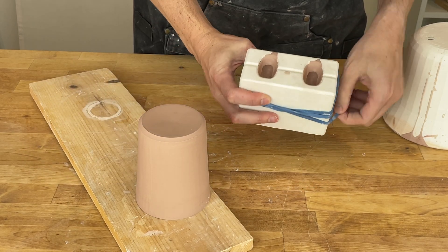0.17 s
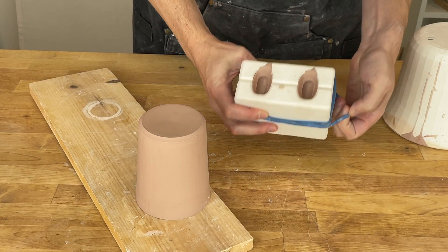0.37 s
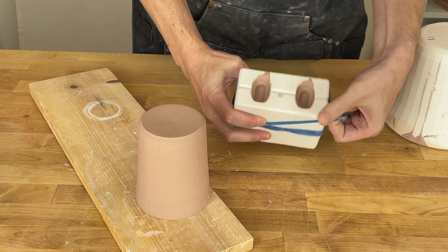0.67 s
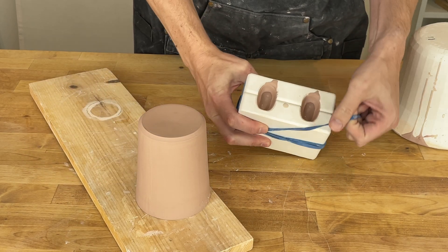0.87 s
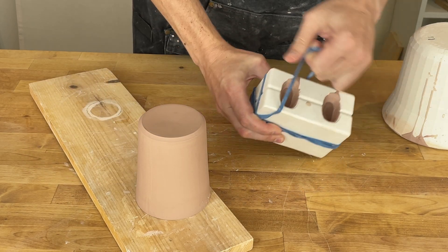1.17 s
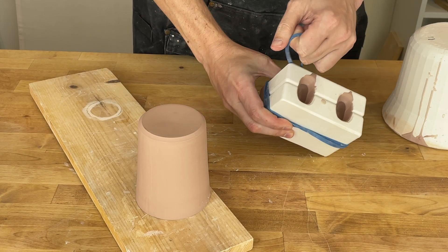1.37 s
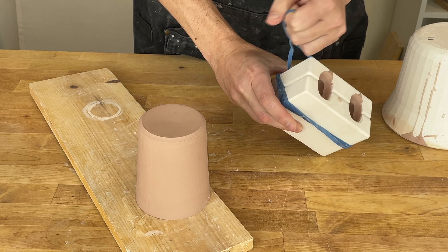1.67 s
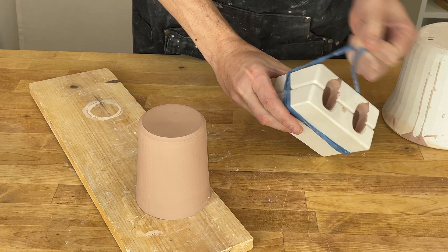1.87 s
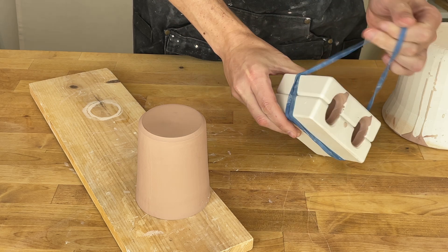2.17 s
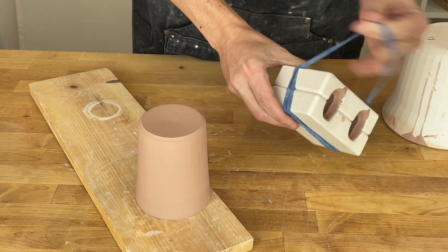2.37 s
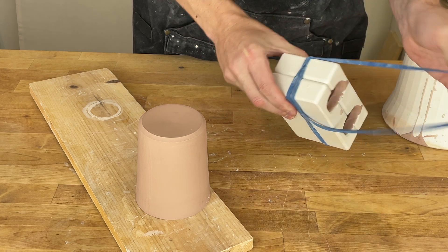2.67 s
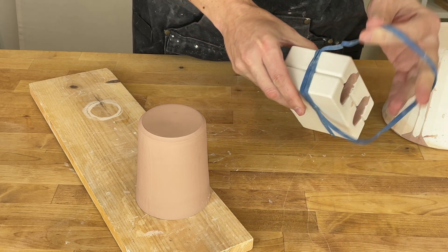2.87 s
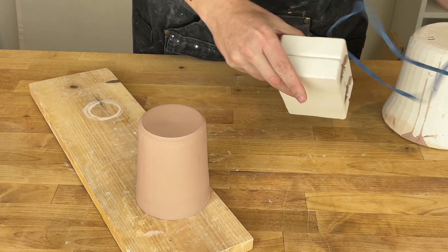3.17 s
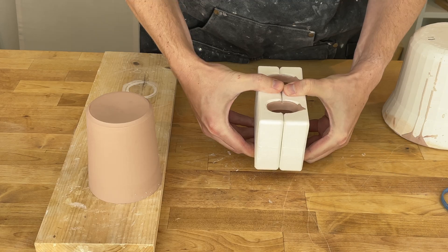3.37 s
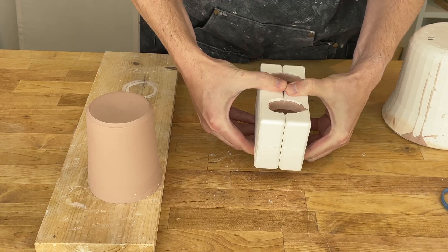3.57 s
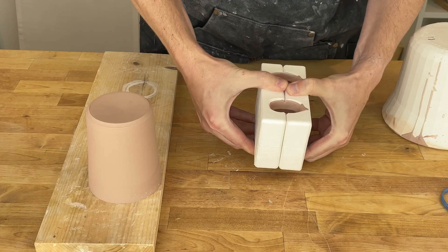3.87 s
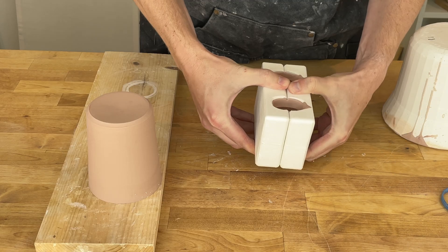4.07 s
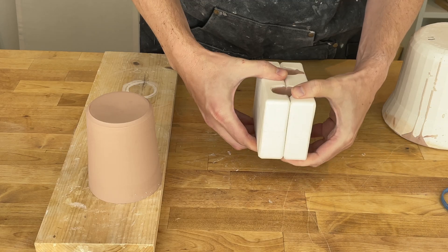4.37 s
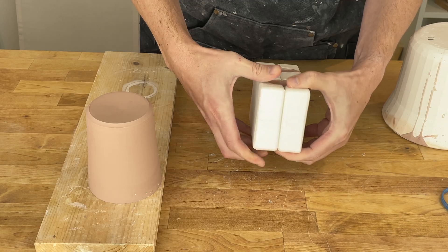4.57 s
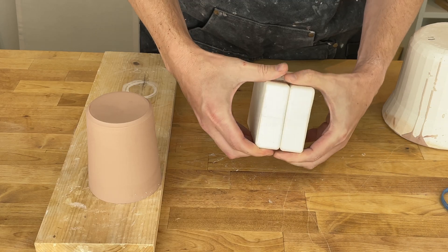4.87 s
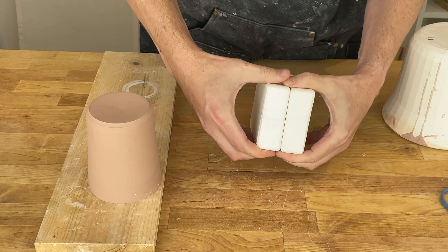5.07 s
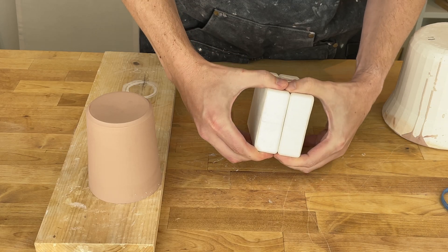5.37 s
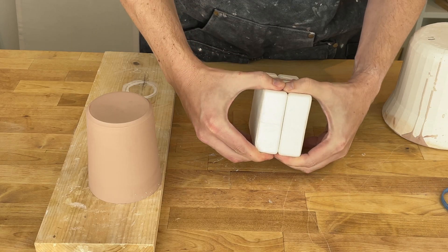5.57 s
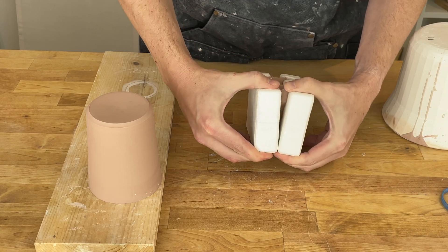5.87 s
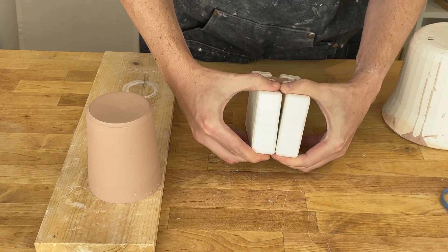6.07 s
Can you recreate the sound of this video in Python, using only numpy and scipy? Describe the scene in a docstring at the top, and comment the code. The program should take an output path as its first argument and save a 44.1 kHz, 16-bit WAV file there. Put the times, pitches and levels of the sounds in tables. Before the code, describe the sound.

Wide rubber bands are worked off a plaster mould, heard close in a small workshop. Soft rubbing and a low flap at 0.3 seconds lead to crackling clicks around 0.7. A band slaps the block with a dull thud at 0.9 seconds. A sharp snap comes just before the loudest thud at 1.2, and a third thud lands at 1.4. Each blow leaves a short, low ring in the room. From 1.5 to 3.2 seconds there are only faint ticks, brief rubs and soft flaps of slack rubber. A quiet stretch follows, with fingers sliding faintly on plaster around 4.3 and 5 seconds. The mould halves bump softly at 5.6, scrape and tick at 5.9, then knock firmly together just before 6 seconds. Underneath run a low rustle of arms and apron, steady ventilation rumble, faint hiss and a thin electrical whine.

```python
"""In a small workshop, wide rubber bands are worked off a two-part plaster mould held over a bench.
The rubber rubs, crackles as it slips, and slaps back on the block; then the halves are eased apart
and knock together. Each blow is a short pulse that sets the room's low notes ringing.
Behind it all are rustling arms, ventilation rumble, faint hiss and an electrical whine."""
import sys
import numpy as np
from scipy import signal
from scipy.fft import rfft, irfft
from scipy.io import wavfile

SR = 44100
rng = np.random.default_rng(int(sys.argv[2]) if len(sys.argv) > 2 else 0)


def to_wav(s):
    """Save 16-bit WAV."""
    ch = np.atleast_2d(s).T  # columns
    pcm = np.round(np.clip(ch, -1, 1) * 32767)  # PCM
    wavfile.write(sys.argv[1], SR, pcm.astype(np.int16))


N = 273728
TIME = np.arange(N) / SR

# blows from the bands, then from the other half of the mould:
# t/s, peak level/dB, low edge/Hz, high edge/Hz, crack level relative to the peak/dB
BLOWS = [(0.8786, -5.5, 191, 568, -19), (1.2262, -3.0, 224, 440, -16), (1.4439, -9.5, 157, 450, -19),
         (5.6088, -23, 93, 440, -20.5), (5.8880, -28.5, 177, 566, -19), (5.9604, -12, 168, 546, -19.5)]


def knocks(soft_hz=790, crack_hz=1500, crack_decay_s=.002, grit=0.1):
    """A soft blow on the block gives one dull pulse, with a little crack where the surfaces meet."""
    out, click = np.zeros(N), signal.unit_impulse(SR // 20)
    contact = cut(click, soft_hz, "low", order=6)  # a soft contact is too slow to make high notes
    crack_fade = np.exp(-TIME[:len(click)] / crack_decay_s)
    for s, db, low_hz, high_hz, crack_db in BLOWS:
        thud = cut(cut(contact, high_hz, "low", order=4), low_hz, "high")
        touches = click + grit * rng.standard_normal(len(click)) * crack_fade
        crack = cut(cut(touches, crack_hz, "low", order=3), soft_hz, "high", order=3)
        add(out, s, from_db(db) * peak_one(thud))
        add(out, s + 0.00065, from_db(db + crack_db) * peak_one(crack))
    return out


def tick(hz, decay_s, grit=0.28, ring_gain=1.2):
    """A slip lets go with one click and a fast-dying spray of smaller ones, ringing briefly."""
    # tone colour that every slip starts from: f/Hz, level/dB
    slip_colour = [(60, -44), (300, -3.5), (700, -2.5), (1700, 3.5), (2700, -1.5), (3500, 3), (5400, 0),
                   (6400, -5.5), (10000, -7), (16000, -9)]
    t = TIME[:SR // 30]
    spray = grit * rng.standard_normal(len(t)) * np.exp(-t / decay_s)
    spray[0] = 1  # the first click
    spray = coloured(spray, slip_colour)
    ring = band_around(spray, hz, octaves=.3, order=1)
    sound = cut(spray, 1.5 * hz, "low", order=1) + ring_gain * ring
    strength = np.sqrt(np.sum(sound ** 2) / (decay_s * SR))
    return sound / (3.04 * strength)  # brings the peak to roughly 1


def ticks():
    """Rubber lets go of an edge or plaster touches plaster; every blow also brings a tick."""
    # lone ticks: t/s, rough peak level/dB, f/Hz
    lone_ticks = [(0.6860, -23, 3800), (0.6940, -28, 4400), (0.7077, -27.5, 6050), (0.7451, -16, 13700),
                  (0.9890, -30, 4860), (1.1683, -9, 4900), (1.173, -20.5, 5990), (1.3782, -32, 3800),
                  (1.3881, -32, 5100), (1.3951, -35, 5540), (1.411, -22, 5900), (1.5793, -33, 6350),
                  (1.6036, -38, 5000), (1.6405, -36, 7500), (1.676, -36.5, 6200), (1.9864, -30.5, 7240),
                  (2.1025, -42.5, 2000), (2.151, -40.5, 3400), (2.558, -28, 7900), (2.6018, -35, 5500),
                  (3.123, -44, 3200), (3.1462, -40.5, 3300), (5.3508, -44.5, 1750), (5.8941, -33.5, 4660),
                  (5.9428, -40.5, 2980)]
    out = np.zeros(N)
    for s, db, hz in lone_ticks:
        add(out, s, from_db(db) * tick(hz, decay_s=0.0014 * (5000 / hz)))  # higher ticks die sooner
    for s, db, *_ in BLOWS:
        add(out, s + 0.0011, from_db(db - 28.5) * tick(hz=5350, decay_s=0.0035))
    return out


def flaps(rebound_db=-8.5, rebound_pitch_ratio=0.63):
    """Slack rubber pushes the air to and fro once, then swings back, weaker and lower."""
    # dull flaps of rubber and shifts of the grip: t/s, peak level/dB, f/Hz
    slack_flaps = [(0.1807, -43.5, 124), (0.3273, -27.5, 111.4), (0.441, -43, 176), (0.5803, -44, 154),
                   (1.9982, -41, 135), (2.18, -45, 115), (2.5416, -36, 197), (2.712, -50, 155),
                   (2.873, -44, 237), (3.1435, -40, 212), (3.209, -36, 156)]
    out, t = np.zeros(N), TIME[:SR // 20] - TIME[SR // 40]
    for s, db, hz in slack_flaps:
        wait_s = .0155 * (155 / hz) ** 2  # slacker, deeper flaps swing back later
        rebound = (s + wait_s, db + rebound_db, hz * rebound_pitch_ratio)
        for swing_s, swing_db, swing_hz in [(s, db, hz), rebound]:
            spread = (np.pi * swing_hz * t) ** 2
            pulse = (1 - 2 * spread) * np.exp(-spread)  # one bump with a dip on each side
            add(out, swing_s + t[0], from_db(swing_db) * pulse)
    return out


def scuffs(rasp_hz=3120, hiss_hz=5800):
    """A hard drag bites and dies away: tiny slips make a hollow body, a rasp and taut rubber's hiss."""
    # drags over an edge of the mould:
    # t/s, rise/s, body level at its loudest/dB, body f/Hz, rasp and hiss relative to the body/dB
    drags = [(0.6810, .007, -43, 750, -6, -17), (1.1652, 0.0028, -27.5, 420, -6, -13),
             (2.102, 0.005, -56.5, 890, -13, -2), (2.151, 0.011, -57, 635, -10, -7),
             (2.551, .012, -56, 910, -0.5, 6), (3.119, .021, -53, 440, -4, -14),
             (5.8841, 0.0048, -41.5, 1210, -3, -38)]
    out, t = np.zeros(N), TIME[:SR // 5]
    for s, rise_s, db, hz, rasp_db, hiss_db in drags:
        slips = tiny_slips(len(t), unevenness_db=5.5)
        body = rms_one(band_around(slips, hz, octaves=1.39))
        rasp = from_db(rasp_db) * rms_one(band_around(slips, rasp_hz, octaves=0.2966, order=1))
        hiss = from_db(hiss_db) * rms_one(band_around(slips, hiss_hz, octaves=2.6, order=1))
        bite = t / rise_s * np.exp(1 - t / rise_s)
        add(out, s, from_db(db) * (body + rasp + hiss) * bite)
    return out


def rubs():
    """Rubber and fingers slide on plaster; tiny slips swell and fade under each stroke."""
    # strokes (narrow ones nearly squeak): t/s, length/s, level at its loudest/dB, f/Hz, width/octaves
    strokes = [(-0.08, 0.36, -67.5, 3930, 0.69), (0.386, 0.091, -61, 794, 3.9),
               (0.513, 0.32, -65, 4000, 1.5), (1.002, 0.14, -66, 5740, 0.67),
               (1.355, 0.098, -52.5, 3840, 1.04), (1.605, 0.12, -60.5, 6240, 0.78),
               (1.96, 0.051, -60.5, 7250, 0.18), (2.098, 0.14, -64, 1720, 1.1),
               (2.442, 0.052, -66, 10000, 0.99), (2.94, 0.037, -64, 6000, 2.2),
               (3.132, 0.09, -58, 1780, 1.7), (4.249, 0.16, -68.5, 5000, 1.3),
               (4.936, .11, -63.5, 3730, 1.8), (5.224, 0.032, -61, 1790, 4)]
    out = np.zeros(N)
    for s, length_s, db, hz, octaves in strokes:
        slips = tiny_slips(int(length_s * SR), unevenness_db=6.0)
        band = rms_one(band_around(slips, hz, octaves))
        swell = np.sin(np.linspace(0, np.pi, len(band)))
        add(out, s, from_db(db) * band * swell)
    return out


def tiny_slips(size, unevenness_db):
    """Friction is a dense stream of little pulses of uneven size."""
    noise, sizes = rng.standard_normal((2, SR // 2))[:, :size]
    return noise * from_db(unevenness_db * sizes)


def room_echoes():
    """The bench top and nearest walls are cluttered, so only the lows bounce back in one piece."""
    # first echoes: delay/s, gain
    echoes = [(.0029, .47), (.0134, .41), (.0244, .51), (.0322, .24)]
    out = np.zeros(N)
    for delay_s, gain in echoes:
        add(out, delay_s, np.array([gain]))
    return cut(out[:SR], 1800, "low")


def room_ring(boost_db=0.32, fade_speedup=1.11):
    """The bench and the air in the room ring at their own notes after a push."""
    # ringing notes of the bench and room, from low to high:
    # f/Hz, gain before boost/dB, time to fade 60 dB before speedup/s
    low_notes = [(45, 17, .36), (59, 14.6, .32), (85, 8, .36), (109, 13.5, .22), (130, 5, .4),
                 (148, 11.5, .52), (163, 1, .5), (192, 11, .21), (239, 11.2, .42), (264, 9.7, .6),
                 (276, 8, .62), (297, 6, .34), (326, -2, .5), (363, 9.5, .28), (377, 6.3, .36),
                 (410, 8, .45), (438, 9, .4), (452, 5.5, .66), (511, 7.2, .38), (527, 11, .4),
                 (565, 4, .55), (594, 3.5, .45), (615, 5.5, .5), (632, 10.5, .29), (656, 4.6, .55),
                 (676, 1.5, .45), (727, 8, .36), (784, -1, .36)]
    high_notes = [(926, 5, .33), (971, 10, .4), (1087, 8, .45), (1193, 10, .5), (1267, 8, .5),
                  (1477, 9, .4), (1811, 8, .42)]
    out, t = np.zeros(SR), np.maximum(TIME[:SR] - .0019, 0)
    for k, (hz, db, fade_s) in enumerate(low_notes + high_notes):
        damping = fade_speedup * np.log(1000) / fade_s
        gain = from_db(db + boost_db) * 2 * damping / SR
        direction = (-1) ** k  # neighbours cancel at first, so the boom builds up after the blow
        out += direction * gain * np.exp(-damping * t) * np.sin(2 * np.pi * hz * t)
    return out


def room_tail(build_up_s=.004):
    """Scattered echoes blur into noise, each band of pitch dying at its own pace."""
    # tone colour of the blurred echoes: f/Hz, level/dB
    tail_colour = [(60, -5), (200, -9), (500, -4), (800, 3), (1300, 3), (2500, 2), (4000, -1), (5400, -4),
                   (9000, -3.5), (16000, 5)]
    # how long they last: f/Hz, time to fade 60 dB/s
    fade_times = [(60, 0.67), (300, 0.6), (1100, 0.51), (3000, 0.38), (7000, 0.43), (16000, .24)]
    out, t = np.zeros(SR), TIME[:SR]
    edges = np.geomspace(40, 17000, 19)
    build_up = 1 - np.exp(-t / build_up_s)
    for low, high in zip(edges, edges[1:]):
        hz = np.sqrt(low * high)
        band = cut(rng.standard_normal(SR), [low, high], "band")
        fade = np.exp(-np.log(1000) * t / at_hz(fade_times, hz))
        gain = from_db(at_hz(tail_colour, hz)) * np.sqrt(2 * (high - low)) / SR
        out += gain * rms_one(band * fade * build_up)
    return out


def background(hiss_db=-63, lump_db=5.5, lump_hz=14):
    """Steady rumble, hiss and whine, with the low, uneven rustle of arms and apron."""
    # ventilation rumble and faint hiss: f/Hz, relative level/dB
    hiss_colour = [(20, -13), (40, -1), (57, 1.5), (85, -1.5), (135, -1), (200, -7.5), (320, -10),
                   (500, -12), (1000, -13.5), (2000, -17), (4000, -18), (8000, -21), (16000, -23.5)]
    # mains hum and electrical whine: f/Hz, level/dB
    tones = [(241, -79), (360.7, -73), (500.3, -79), (1000.5, -74), (2001, -82.5), (2499, -82),
             (3499, -81.5), (4000, -86.5), (4500, -86), (5001, -84), (5501, -90), (6001, -87), (6499, -88),
             (7499, -90)]
    # rustle of moving arms: t/s, level/dB
    arm_motion = [(0, -69), (0.3, -61), (0.42, -56.5), (0.8, -69), (1.7, -60), (2.3, -58.5), (2.8, -66.5),
                  (3.3, -62), (3.5, -79.5), (4.5, -77.5), (4.8, -64.5), (5.1, -73.5), (6.2, -77.5)]
    hiss = from_db(hiss_db) * rms_one(coloured(rng.standard_normal(N), hiss_colour))
    whine = sum(from_db(db) * np.sqrt(2) * np.sin(2 * np.pi * (hz * TIME + rng.random()))
                for hz, db in tones)
    lumps = from_db(lump_db * rms_one(cut(rng.standard_normal(N), lump_hz, "low")))
    rustle = rms_one(lumps * cut(rng.standard_normal(N), [50, 340], "band"))
    rustle_db = np.interp(TIME, *np.transpose(arm_motion))
    return hiss + whine + from_db(rustle_db) * rustle


def from_db(db):
    """Turn decibels into a gain."""
    return 10 ** (np.asarray(db) / 20)


def rms_one(x):
    """Scale a sound so its average strength (root mean square) is 1."""
    return x / np.sqrt(np.mean(x ** 2) + 1e-20)


def peak_one(x):
    """Scale a sound so its peak is 1."""
    return x / (np.abs(x).max() + 1e-20)


def at_hz(points, hz):
    """Read between a table's rows, with octaves evenly spaced."""
    table = np.array(points)
    return np.interp(np.log(np.maximum(hz, 1)), np.log(table[:, 0]), table[:, 1])


def cut(x, hz, kind, order=2):
    """Keep the "low" part, the "high" part or a "band"; a higher order cuts more sharply."""
    edges = np.clip(hz, 10, .45 * SR)
    return signal.sosfilt(signal.butter(order, edges, kind, fs=SR, output="sos"), x)


def band_around(x, hz, octaves, order=2):
    """Keep a band with this centre and width."""
    return cut(x, [hz * 2 ** (-octaves / 2), hz * 2 ** (octaves / 2)], "band", order=order)


def coloured(x, colour):
    """Give a sound a tone colour without letting anything sound early (a minimum-phase filter)."""
    size = 2 ** 13
    gains = from_db(at_hz(colour, np.fft.rfftfreq(size, 1 / SR)))
    cepstrum = irfft(np.log(gains))
    cepstrum[1:size // 2] *= 2  # fold the late half onto the early half
    cepstrum[size // 2 + 1:] = 0
    click_response = irfft(np.exp(rfft(cepstrum)))
    return signal.fftconvolve(x, click_response)[:len(x)]


def add(track, s, sound):
    """Mix a sound in from time s."""
    start = round(s * SR)
    first, last = max(start, 0), min(start + len(sound), N)
    track[first:last] += sound[first - start:last - start]


def scene(tick_room_db=-6.5, flap_room_db=-18.5, rub_room_db=-10.0):
    """Blows fill the room; the small sounds of the hands stay close."""
    blows, slips, slack, sliding = knocks(), ticks(), flaps(), rubs() + scuffs()
    into_room = (blows + from_db(tick_room_db) * slips + from_db(flap_room_db) * slack
                 + from_db(rub_room_db) * sliding)
    room = signal.fftconvolve(into_room, room_echoes() + room_ring() + room_tail())[:N]
    return (blows + slips + slack + sliding + room + background())[None]


def record(dry, bottom_hz=22, top_hz=16000):
    """The deepest rumble and the very highest treble are cut."""
    steep_top_cut = signal.ellip(10, .1, 80, top_hz, fs=SR, output="sos")
    return signal.sosfilt(steep_top_cut, cut(dry, bottom_hz, "high"))


dry = scene()
out = record(dry)
to_wav(out)
```